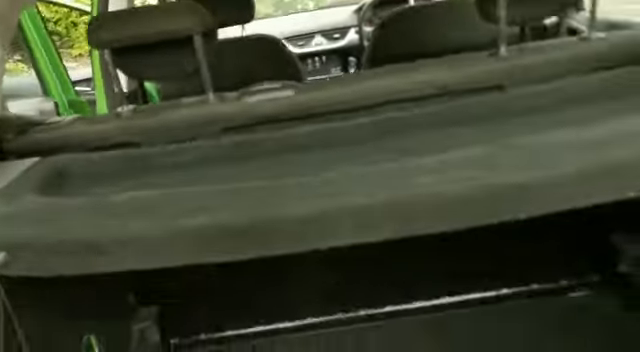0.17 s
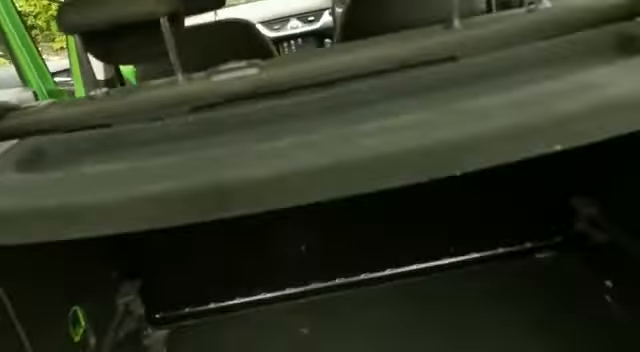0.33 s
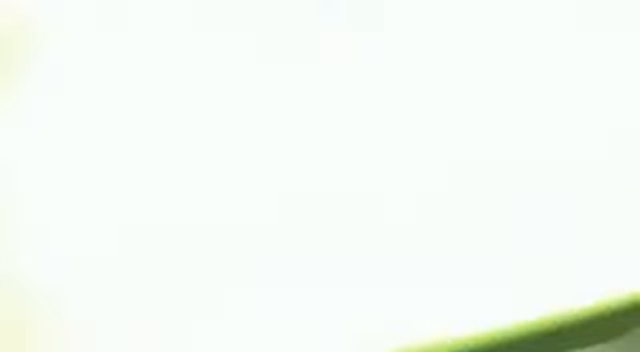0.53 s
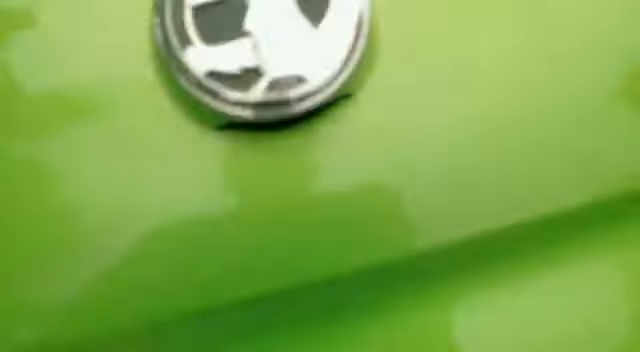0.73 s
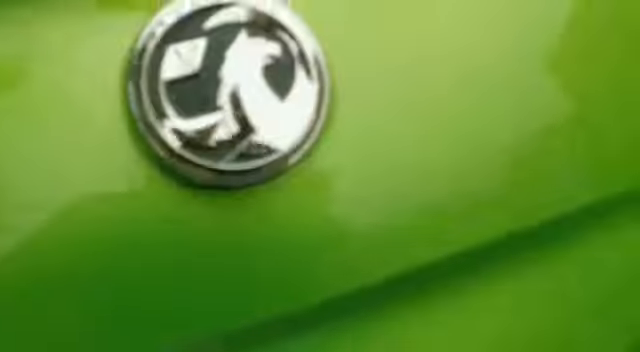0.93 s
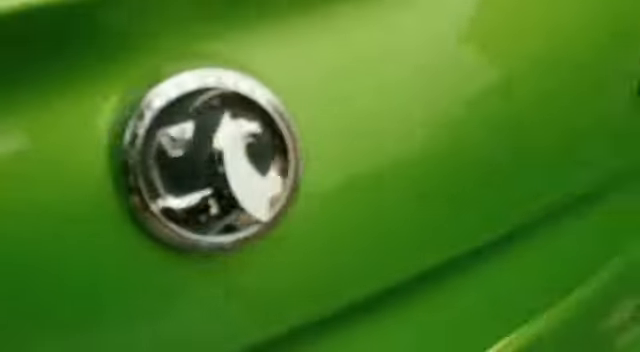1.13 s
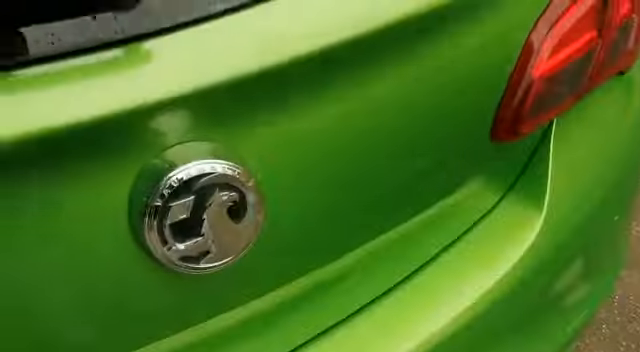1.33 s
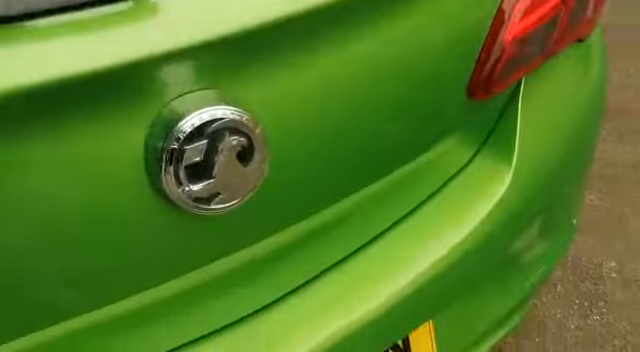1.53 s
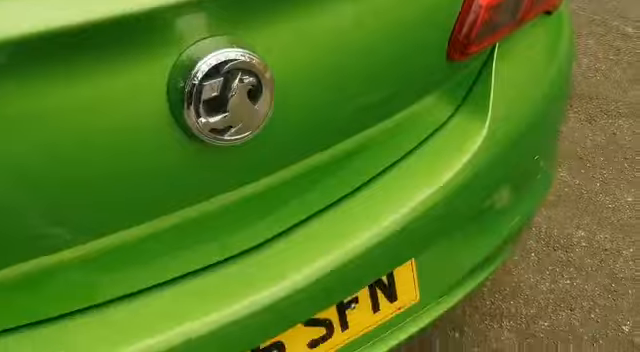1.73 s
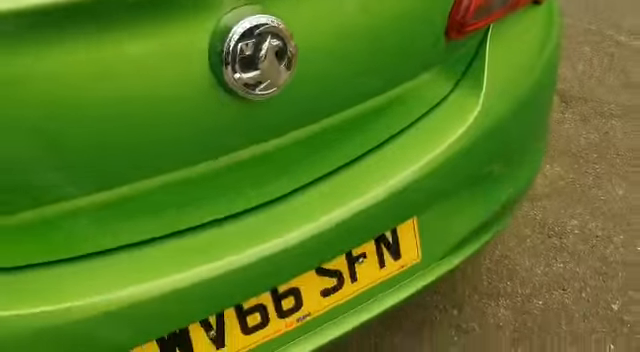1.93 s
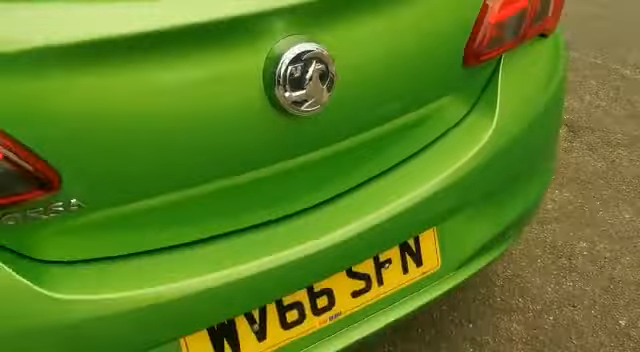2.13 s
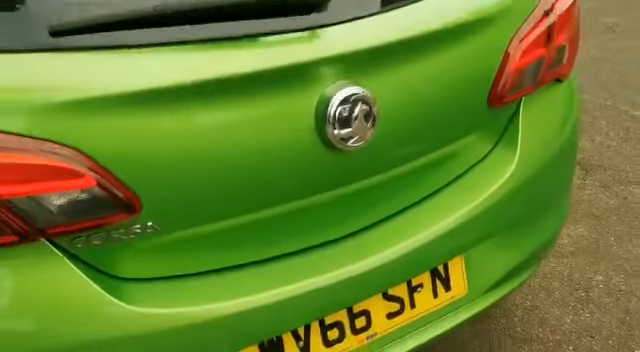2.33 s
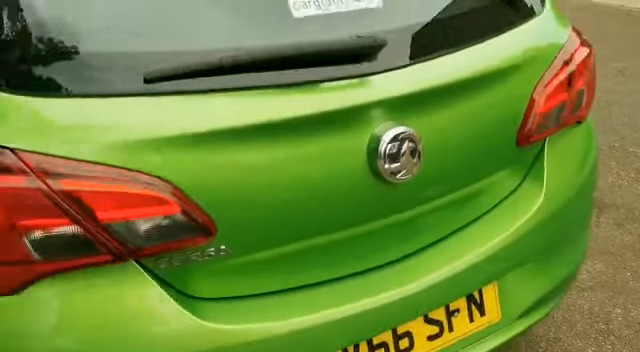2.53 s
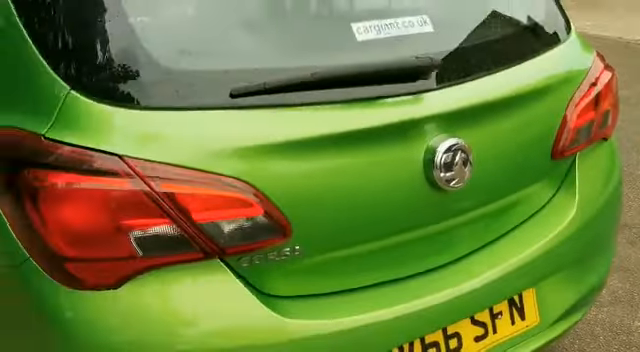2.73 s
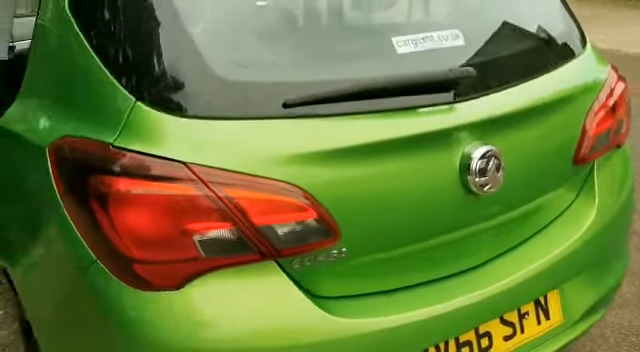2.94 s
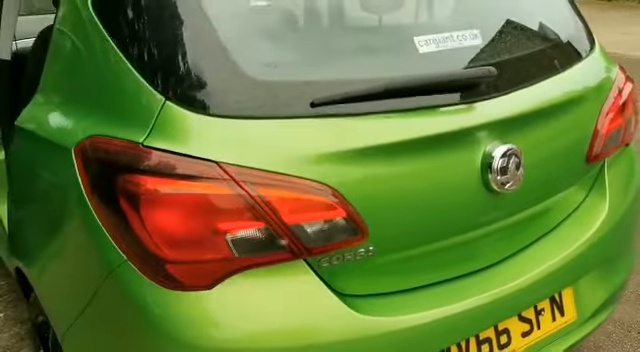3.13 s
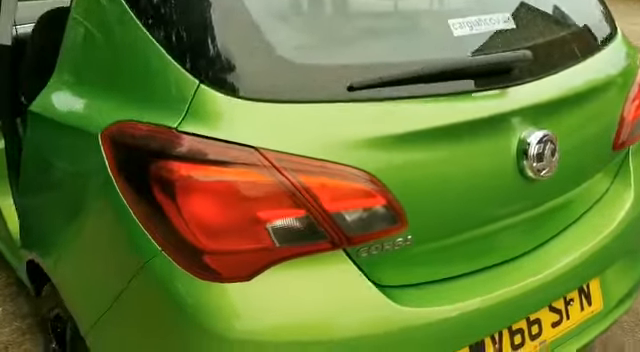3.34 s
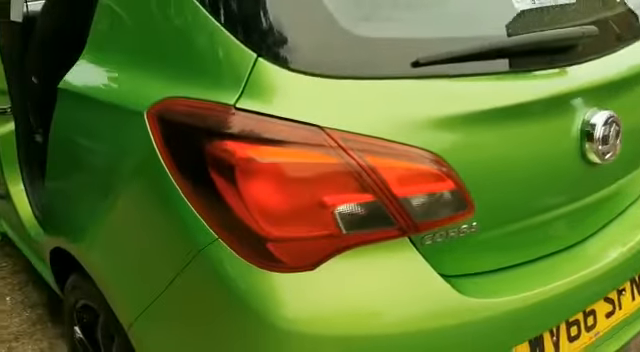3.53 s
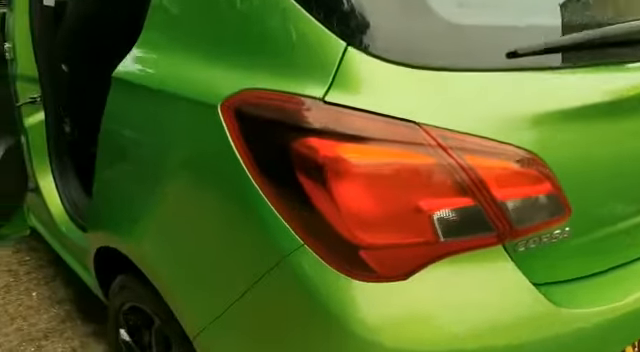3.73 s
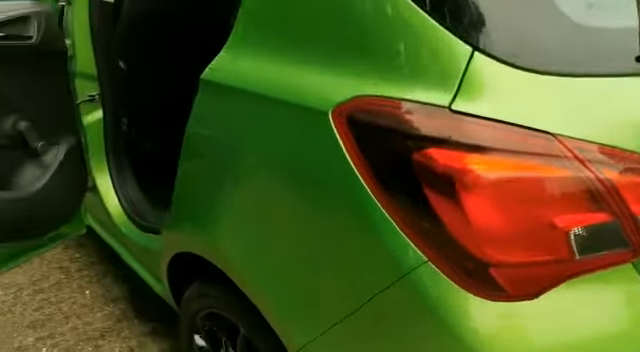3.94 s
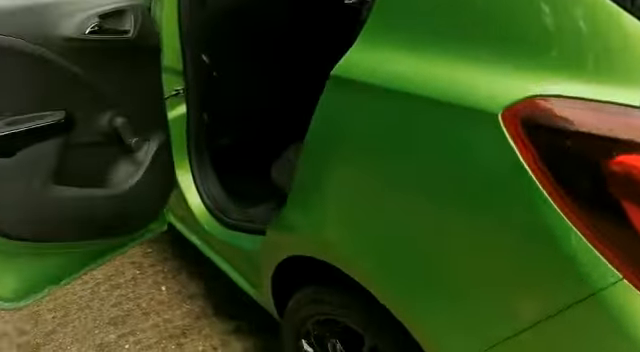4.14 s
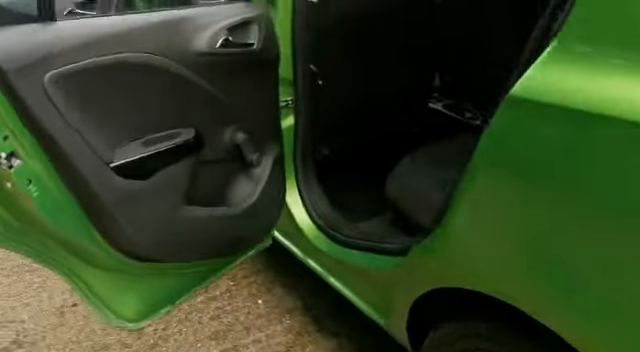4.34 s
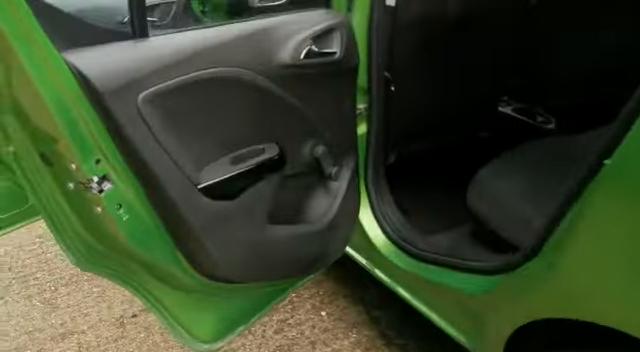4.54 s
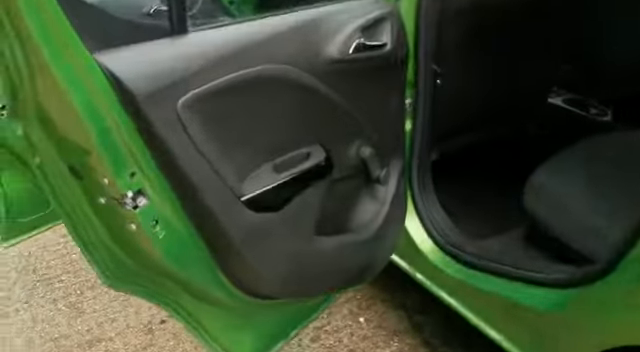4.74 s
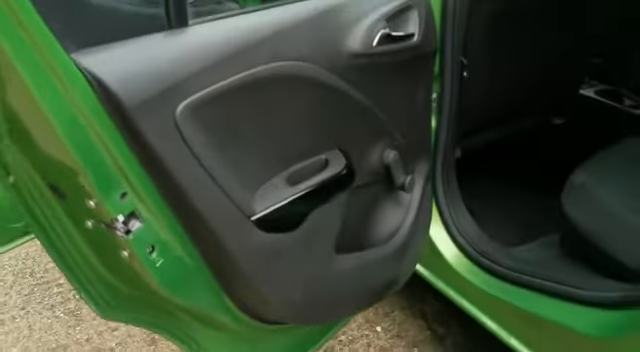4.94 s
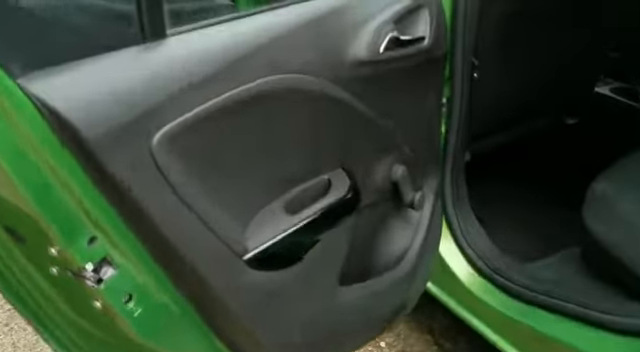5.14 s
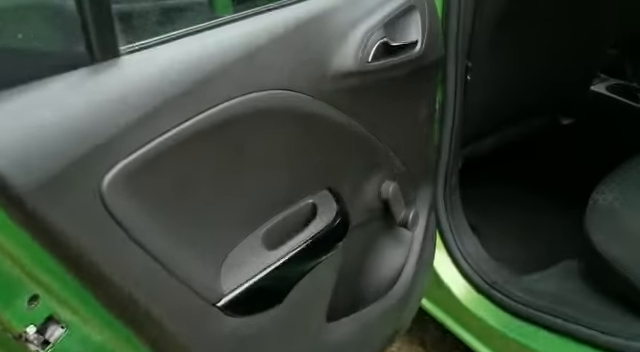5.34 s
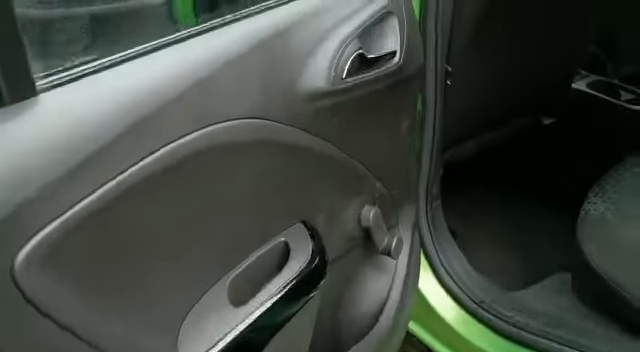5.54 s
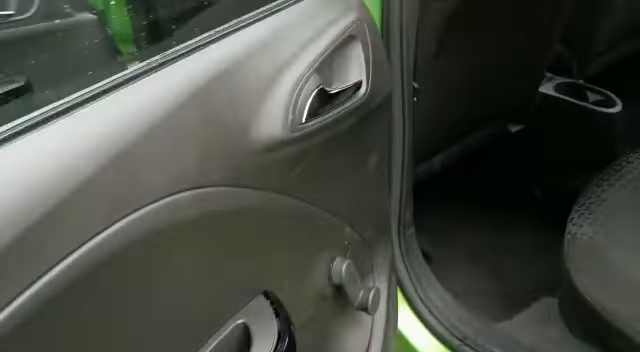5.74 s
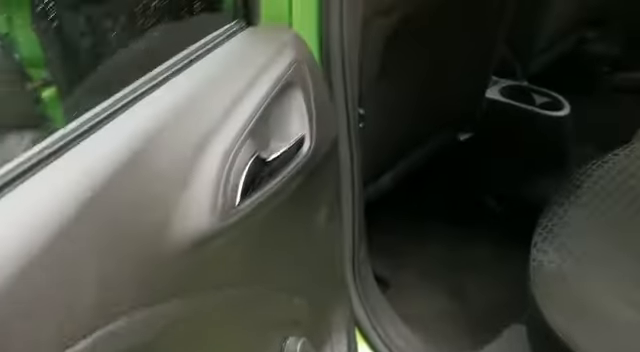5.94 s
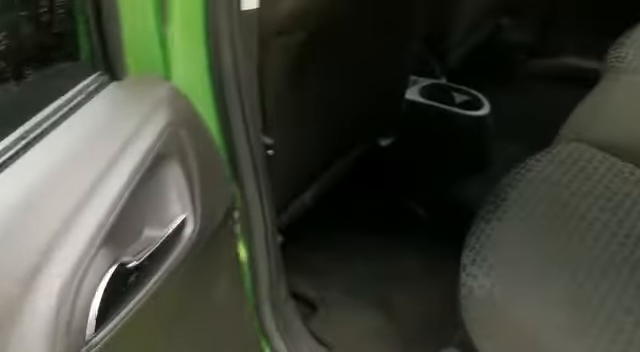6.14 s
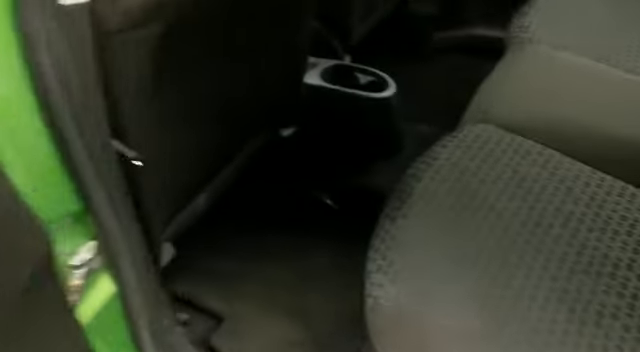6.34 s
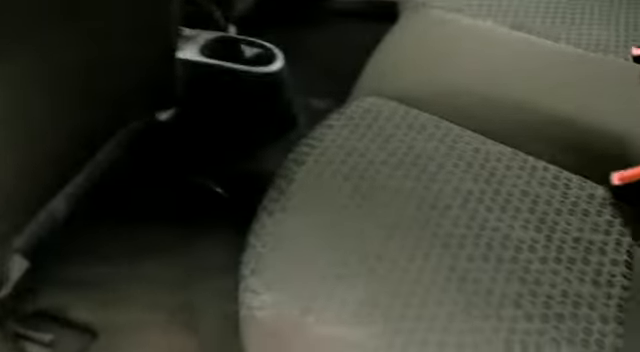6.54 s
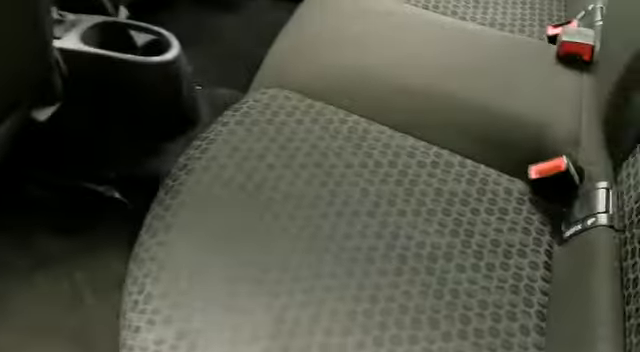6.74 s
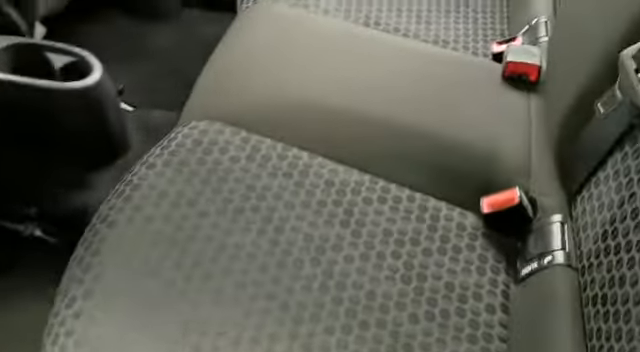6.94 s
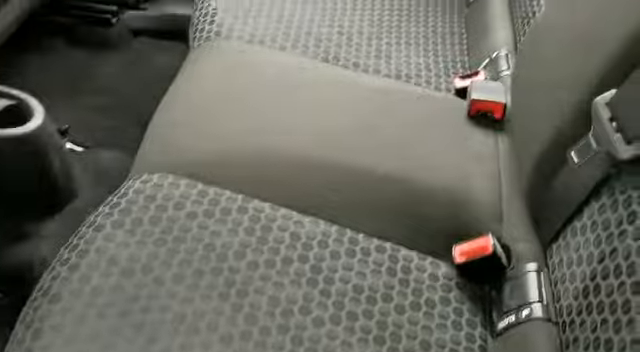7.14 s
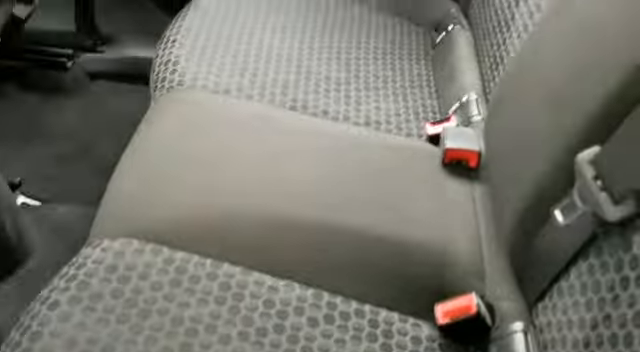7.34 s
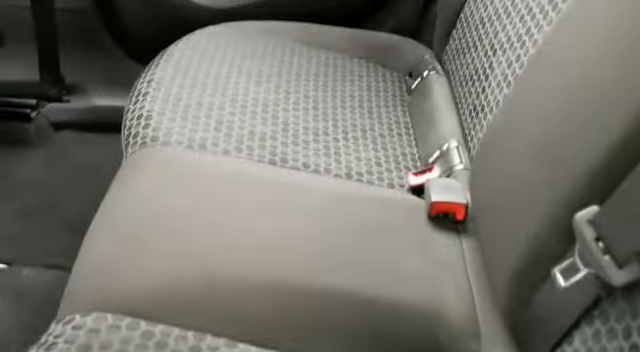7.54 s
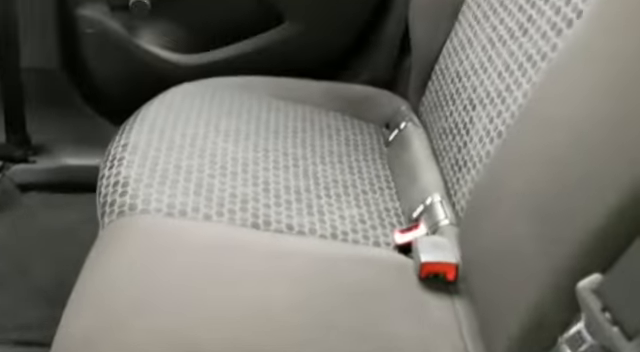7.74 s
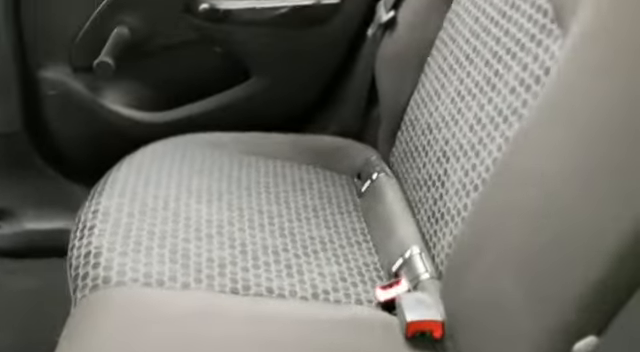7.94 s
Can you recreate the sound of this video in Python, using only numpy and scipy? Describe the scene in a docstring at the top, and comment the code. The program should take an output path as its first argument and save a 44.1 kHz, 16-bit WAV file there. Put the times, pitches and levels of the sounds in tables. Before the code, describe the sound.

Outdoors by a parked hatchback, small birds chirp and shoes scuff; the tailgate slams once with a booming metallic thud, then footsteps, clicks and more chirps.

```python
"""First comes an open-air hush with a hollow drone, a low throb, rustling clothes and chirping birds.
Footfalls and scuffs join in, then a hatchback's tailgate slams: metal rings, cabin air booms, a latch snaps.
Clicks and more calls follow. Shaped noise makes the hush, brushing and clatter; sine waves with
a bending pitch make the birds; dying sine waves make the boom and the panel tones.
The two channels differ: the right one is strong near 3 kHz and weak near 7.6 kHz."""
import sys
import numpy as np
from scipy import signal
from scipy.fft import rfft, irfft, next_fast_len
from scipy.io import wavfile

SR = 44100
rng = np.random.default_rng(int(sys.argv[2]) if len(sys.argv) > 2 else 0)


def wav_record(signal):
    """Record a signal, one row per channel, as 16-bit PCM in the file named by sys.argv[1]."""
    frames = np.transpose(np.atleast_2d(signal))
    bounded = np.clip(frames, -1, 1)
    # unit amplitude maps onto the largest positive 16-bit level
    quanta = np.round(bounded * 32767).astype(np.int16)
    wavfile.write(sys.argv[1], SR, quanta)


N = 352138
TIME = np.arange(N) / SR


def from_db(db):
    """Turn decibels into an amplitude factor."""
    return 10 ** (np.asarray(db) / 20)


def level_over_time(points):
    """Draw a gain curve through (time in s, level in dB) points."""
    return from_db(np.interp(TIME, *np.transpose(points)))


def at_hz(points, hz):
    """Read a table between its points, with frequency spaced as we hear it (logarithmic)."""
    known_hz, values = np.transpose(points)
    return np.interp(np.log(np.maximum(hz, 1)), np.log(known_hz), values)


def colour(x, spectrum):
    """Filter with the given gains in dB, without sounding ahead of the input (minimum phase)."""
    size = 2 * next_fast_len(x.shape[-1] // 2 + 4096)
    gains = from_db(at_hz(spectrum, np.fft.rfftfreq(size, 1 / SR)))
    # Folding the cepstrum forward in time gives the filter its minimum phase.
    cepstrum = irfft(np.log(gains))
    cepstrum[1:size // 2] *= 2
    cepstrum[size // 2 + 1:] = 0
    response = np.exp(rfft(cepstrum))
    return irfft(rfft(x, size) * response)[..., :x.shape[-1]]


# How alike left and right are in sound from all around: pitch_hz, likeness (0 to 1)
LIKENESS = [(60, 0.97), (150, 0.69), (300, 0.96), (640, 0.26), (1400, 0.01), (3000, 0)]


def diffuse(size):
    """Stereo noise of 0 dB per Hz, alike in the bass and unrelated in the treble."""
    padded = next_fast_len(size)
    mid, side = rfft(rng.standard_normal((2, padded)))
    alike = np.clip(at_hz(LIKENESS, np.fft.rfftfreq(padded, 1 / SR)), 0, 1)
    shared = np.sqrt(1 + alike) * mid
    opposed = np.sqrt(1 - alike) * side * [[1], [-1]]
    return irfft(shared + opposed, padded)[:, :size] * np.sqrt(SR) / 2


def dying(t, t60):
    """Fall by 60 dB in t60 seconds; silent before zero."""
    return (t >= 0) * np.exp(-np.log(1000) * np.maximum(t, 0) / t60)


def ring(t, hz, t60):
    """One way a struck object vibrates: a sine wave that dies away."""
    return np.sin(2 * np.pi * hz * t) * dying(t, t60)


def wobble(size, per_s):
    """Random motion: per_s random values a second, joined by straight lines."""
    knots = rng.standard_normal(1024)
    return np.interp(TIME[:size] * per_s, np.arange(len(knots)), knots)


def add(out, s, sound):
    """Mix a sound in from time s on."""
    start = max(round(s * SR), 0)
    part = sound[..., :max(N - start, 0)]
    out[..., start:start + part.shape[-1]] += part


def knock(db, hz, width_hz, t60):
    """A sharp start and a dying flurry of noise, through a broad resonance; db is its peak."""
    t = TIME[:SR // 2]
    burst = diffuse(len(t)) / np.sqrt(SR / 2) * dying(t, t60) + 1e-18
    burst[:, 0] += 4   # the sharp start
    r = np.exp(-np.pi * width_hz / SR)
    resonance = [1, 0, -1, 1, -2 * r * np.cos(2 * np.pi * hz / SR), r * r]
    sound = signal.sosfilt([resonance, resonance], burst)   # twice, for steep skirts
    return from_db(db) * sound / np.abs(sound).max(axis=1, keepdims=True)


# Distant traffic and breeze before the swell: pitch_hz, level_db_per_hz
AIR_SPECTRUM = [(20, -75), (60, -76.5), (110, -76.5), (200, -81.5), (400, -90.5), (1000, -99.5),
                (2000, -102), (4000, -104), (6000, -110), (7500, -113), (9300, -109), (12000, -113),
                (15500, -115)]
# Swell of that hush: time_s, level_db
AIR_LEVEL = [(0, -0.5), (2.5, -1.5), (3.9, -1.5), (4.3, 1), (5.2, -1.5), (5.9, 0.5), (6.6, -0.5), (7.6, -3),
             (8, -2.5)]


def open_air():
    """Distant traffic and breeze: noise with its own colour and a gentle swell."""
    return colour(diffuse(N), AIR_SPECTRUM) * level_over_time(AIR_LEVEL)


# Hollow drone before the swell: pitch_hz, level_db_per_hz
DRONE_SPECTRUM = [(400, -112), (560, -98), (650, -91), (800, -100), (940, -98), (1150, -103), (1500, -101),
                  (2200, -116), (5000, -135)]
# Swell of the drone beside the open door: time_s, level_db
DRONE_LEVEL = [(0, -9), (3.9, -3.5), (4.5, 0.5), (5.3, 2), (5.8, -0.5), (6.3, -21), (8, -6)]


def hollow_drone():
    """Noise gathered into a few pitch regions sounds hollow."""
    return colour(diffuse(N), DRONE_SPECTRUM) * level_over_time(DRONE_LEVEL)


THROB_HZ = 22.69
# Harmonics of the throb, lowest first: level_db
THROB_HARMONICS = [-48, -56, -78, -69.5]


def throb():
    """A faint steady tone built from its first harmonics."""
    out = np.zeros(N)
    for harmonic, db in enumerate(THROB_HARMONICS, start=1):
        out += from_db(db) * np.cos(2 * np.pi * harmonic * THROB_HZ * TIME)
    return out


# Rustle of clothes: time_s, level_db (relative to the brushing spectrum)
RUSTLE_LEVEL = [(0, -13.5), (2.1, -8.5), (2.7, -19), (4.1, -22), (4.6, -9.5), (5.5, -11), (6.0, -6),
                (6.4, -21), (7.0, -8), (8, -16)]
# Shoes brushing the ground: start_s, level_db (relative to the brushing spectrum)
SCUFFS = [(0.161, 2.5), (.29, 1.5), (.40, -1), (0.86, -3), (1.32, 1), (1.79, -1.5), (2.45, -2), (3.609, -2),
          (4.235, -2.5), (5.79, 4), (6.57, 1)]
# Brushing of shoes and clothes before its strength is set: pitch_hz, level_db_per_hz
BRUSHING_SPECTRUM = [(1000, -122), (3000, -114), (6000, -110), (9500, -107), (13000, -111), (15500, -114)]
SCUFF_RISE_S, SCUFF_LEFT_DB = 0.026, 1.5


def brushing(grain_db=4.5):
    """Gritty noise: scuffs start quickly and trail off over the rustle of clothes."""
    pressure = level_over_time(RUSTLE_LEVEL)
    for s, db in SCUFFS:
        age = np.maximum(TIME - s, 0) / SCUFF_RISE_S
        pressure += from_db(db) * age * np.exp(1 - age)
    # Each grain holds one random strength for 32 samples.
    grain_strength = np.repeat(rng.standard_normal(N // 32 + 1), 32)[:N]
    noise = diffuse(N) * pressure * from_db(grain_db * grain_strength)
    return colour(noise, BRUSHING_SPECTRUM) * from_db([[SCUFF_LEFT_DB], [0]])


# Syllable shapes, by name: pitch at even steps, as a share of the top pitch
SHAPES = {"slur": [0.99, 0.96, .83, .72, .65], "arch": [.83, 1, 1, .94, .82, .77, .74], "pip": [.89, 0.98,
          0.99, .98, .9], "peak": [.74, .85, 1, .88, .73], "whistle": [1, 0.96, .91, .89]}
# How each shape is sung, by name: fade_db from start to end, hoarseness (0 to 1)
VOICING = {"slur": (1, 0.42), "arch": (9.4, .27), "pip": (0.73, 0.38), "peak": (1, 0.43),
           "whistle": (0, .1)}


def syllable(shape, length_s, top_hz, db, waver=0.018, edge=0.22,
             low_voice=0.32, low_voice_ratio=0.85, quaver_db=2.0):
    """A whistle with a fast, hoarse flutter; the other half of the syrinx sings lower with it."""
    size = int(length_s * SR)
    fade_db, hoarseness = VOICING[shape]
    progress = np.linspace(0, 1, size)
    steps = np.linspace(0, 1, len(SHAPES[shape]))
    pitch = top_hz * np.interp(progress, steps, SHAPES[shape])
    phase = 2 * np.pi * np.cumsum(pitch * (1 + waver * wobble(size, 442.4))) / SR
    flutter = hoarseness * wobble(size, 1279)
    voices = np.sin(phase + flutter)
    voices += low_voice * hoarseness * np.sin(low_voice_ratio * phase + 2 * flutter)
    roughness = 1 + hoarseness * wobble(size, 1115)
    # Both ends are smoothed over this share of the syllable.
    swell = np.sin(np.pi / 2 * np.clip(np.minimum(progress, 1 - progress) / edge, 0, 1))
    loudness = from_db(db - fade_db * progress + quaver_db * wobble(size, 161))
    return loudness * swell * voices * roughness


# Two-syllable calls, by name, a row per syllable:
# shape, start (share of call), length (share of call), pitch_ratio, level_db (added to the call's)
PHRASES = {"cheer": [("slur", 0, .48, 0.99, 0), ("arch", .59, .45, .71, 2.1)],
           "chirrup": [("pip", 0, 0.287, 1, 0), ("arch", .27, .73, .81, 0.89)],
           "flick": [("slur", 0, 0.58, 0.96, -12.5), ("arch", .48, .52, .87, 4.9)]}


def sing(calls):
    """Each call is one syllable or a phrase of two, stretched and transposed."""
    song = np.zeros(N)
    for s, call, length_s, top_hz, db in calls:
        parts = PHRASES.get(call, [(call, 0, 1, 1, 0)])
        for shape, start, share, ratio, accent_db in parts:
            sound = syllable(shape, share * length_s, ratio * top_hz, db + accent_db)
            add(song, s + start * length_s, sound)
    return song


# Nearby calls and two distinct echoes of them (the slurs at 5.2 and 5.595): start_s,
# syllable or phrase name, length_s, reference pitch_hz, level_db (before path and scattered echoes)
CHIRPS = [ (0.131, "pip", .048, 4460, -51), (0.137, "arch", .066, 3626, -56.5),
          (0.221, "peak", 0.031, 4630, -49.5), (0.353, "chirrup", 0.099, 4610, -55.5),
          (0.588, "peak", 0.084, 4410, -62), (0.75, "slur", .11, 6120, -63),
          (0.835, "cheer", 0.13, 4716, -48.5), (0.992, "arch", .095, 3523, -52.5),
          (0.999, "pip", 0.0326, 4150, -55.5), (1.184, "arch", 0.072, 3790, -56),
          (1.272, "pip", .034, 6700, -57), (1.306, "whistle", .036, 6450, -51.5),
          (1.364, "arch", .064, 3930, -53.5), (1.727, "pip", 0.037, 4700, -45),
          (1.806, "peak", 0.044, 4786, -50), (1.828, "arch", 0.066, 3664, -47),
          (2.026, "chirrup", .132, 4083, -59.5), (2.238, "chirrup", .12, 4266, -57),
          (2.403, "slur", 0.036, 3890, -64.5), (2.804, "flick", .116, 4590, -51.5),
          (3.206, "cheer", .132, 4790, -47), (3.235, "pip", 0.1, 8500, -64.5),
          (3.434, "arch", 0.098, 3330, -57), (4.204, "pip", 0.025, 4700, -61.5),
          (4.386, "peak", .042, 4800, -50), (4.427, "arch", .066, 3650, -52),
          (4.484, "pip", .04, 4653, -43.5), (4.566, "pip", 0.041, 4553, -48.5),
          (4.645, "arch", 0.11, 3490, -52), (4.825, "whistle", .066, 6570, -55.5),
          (5.154, "slur", .04, 4650, -59), (5.2, "slur", .08, 4500, -64),
          (5.56, "cheer", 0.15, 4720, -53.5), (5.595, "slur", 0.065, 4620, -52.5),
          (6.048, "flick", .066, 4800, -54), (6.17, "whistle", 0.078, 6400, -66),
          (6.245, "whistle", .15, 5200, -71), (6.694, "pip", 0.083, 5710, -61)]
# Level of birds in farther gardens, before the echoes: time_s, level_db
FAR_LEVEL = [(0, -62), (1, -66.5), (2.6, -75.5), (4.2, -68), (5.7, -67), (6.3, -68), (6.7, -67),
             (7.15, -73), (7.35, -88)]


def far_chirps(count=130):
    """Birds in farther gardens repeat the lower rows of the chirp table at random moments."""
    songs = [row[1:4] for row in CHIRPS if row[3] < 5000]
    moments = (np.arange(count) + rng.random(count)) * N / SR / count
    choices = rng.integers(len(songs), size=count)
    calls = []
    for s, which in zip(moments, choices):
        db = np.interp(s, *np.transpose(FAR_LEVEL))
        calls.append((s, *songs[which], db))
    return calls


def street(x, t60, build_s, lumpy_db):
    """Scattered echoes from walls, fences and cars: uneven in strength, different on each side."""
    t = TIME[:SR]
    echoes = rng.standard_normal((2, SR)) * dying(t, t60) * (1 - np.exp(-t / build_s))
    lumps = np.interp(t, np.linspace(0, 1, 200), rng.standard_normal(200))
    echoes *= from_db(lumpy_db * lumps)
    echoes /= np.sqrt(np.sum(echoes ** 2, axis=1, keepdims=True))
    return signal.fftconvolve(x[None], echoes, axes=1)[:, :N]


# Straight path as the car comes between bird and microphone: time_s, level_db
BIRD_DIRECT = [(0, 6), (.8, 5.5), (3.4, 5.5), (4.5, -1), (5.6, -0.5), (7.9, -6)]
WALL_DELAY_S, WALL_DB = .042, -9.5   # echo from the nearest house wall
BIRD_LEFT_DB = -4.5


def birds(echo_db=0.5):
    """The chirp table is heard directly, off a wall and scattered; far birds only scattered."""
    near = sing(CHIRPS)
    far = sing(far_chirps())
    direct = near * level_over_time(BIRD_DIRECT)
    add(direct, WALL_DELAY_S, from_db(WALL_DB) * near)
    scattered = street(near + far, t60=0.57, build_s=0.0017, lumpy_db=2.5)
    return (direct + from_db(echo_db) * scattered) * from_db([[BIRD_LEFT_DB], [0]])


# Soft footfalls and bumps: start_s, peak_db, pitch_hz
BUMPS = [(1.091, -40.5, 70), (1.286, -34, 90), (1.845, -30.5, 48.6), (3.609, -40.5, 83.5), (3.789, -44, 59),
         (4.08, -44, 210), (4.171, -39.5, 98), (4.36, -45, 98), (5.85, -42.5, 125.3), (6.15, -42, 109),
         (7.12, -50, 110), (7.72, -48, 105)]
BUMP_T60_S = 0.39


def footfalls(bump_width=0.59):
    """Dull knocks; each one's resonance has a width that is a share of its pitch."""
    out = np.zeros((2, N))
    for s, db, hz in BUMPS:
        add(out, s, knock(db, hz, bump_width * hz, BUMP_T60_S))
    return out


# Small clicks: dull, bright, and one very short one near the end:
# start_s, peak_db, pitch_hz, t60_s
TICKS = [(1.4365, -34, 1020, .064), (1.693, -48, 890, .018), (1.724, -42, 1470, 0.0064),
         (2.965, -42.5, 880, 0.0098), (4.07, -44, 1190, 0.015), (4.090, -46.5, 800, .037),
         (4.816, -45.5, 910, 0.021), (5.72, -44.5, 7990, .0034), (6.597, -47, 2330, 0.017),
         (7.217, -44, 6000, .012), (7.218, -49, 950, 0.0093), (7.784, -49, 1400, 0.0081),
         (7.9306, -29.5, 1780, .0008)]
TICK_WIDTH = 1.07   # bandwidth as a share of pitch
TICK_BODY_HZ, TICK_BODY_DB, TICK_BODY_T60_S = 117, -7, 0.036   # thump, level relative to its click


def ticks():
    """Small sharp clicks, each with a dull thump; the higher a click, the broader it is."""
    out = np.zeros((2, N))
    for s, db, hz, t60 in TICKS:
        add(out, s, knock(db, hz, TICK_WIDTH * hz, t60))
        thump = knock(db + TICK_BODY_DB, TICK_BODY_HZ, TICK_WIDTH * TICK_BODY_HZ, TICK_BODY_T60_S)
        add(out, s, thump)
    return out


# Tailgate meets the body: start_s, strength_db
CONTACTS = [(1.4555, 1.5), (1.4628, -2)]
# Dense ring of metal, glass and trim, before strength and decay: pitch_hz, level_db_per_hz
CLATTER_SPECTRUM = [(100, -71), (200, -44.5), (500, -58.5), (900, -58.5), (1500, -60), (2500, -61),
                    (3800, -65), (4600, -60), (6500, -75), (7700, -81), (9500, -73), (15000, -82)]
# How long the ring lasts: pitch_hz, t60_s
CLATTER_T60 = [(100, 0.23), (400, 0.27), (1000, 0.11), (2500, 0.16), (5000, 0.095), (9000, 0.13),
               (15000, 0.1)]


def clatter():
    """Every contact sets countless close tones ringing; each pitch region dies at its own rate."""
    t, out = TIME[:SR // 2], np.zeros((2, N))
    centres = np.geomspace(100, 15000, 9)
    bins_hz = np.fft.rfftfreq(len(t), 1 / SR)
    for s, db in CONTACTS:
        noise = rfft(diffuse(len(t)))
        dense_ring = np.zeros((2, len(t)))
        for hz in centres:
            # Overlapping bands: one at its centre, zero at the neighbouring centres.
            band_gain = at_hz(np.c_[centres, centres == hz], bins_hz)
            dense_ring += irfft(noise * band_gain, len(t)) * dying(t, at_hz(CLATTER_T60, hz))
        add(out, s, from_db(db) * colour(dense_ring, CLATTER_SPECTRUM))
    return out


SEAL_S = 1.463   # the seal closes and squeezes the cabin air
# Tones of the cabin air and the whole door: pitch_hz, level_db, t60_s
CABIN_TONES = [(34.3, -10.5, 0.27), (59, -9.5, 0.14), (115, -14.5, 0.1)]
# Tones of the sheet metal: pitch_hz, level_db, t60_s
PANEL_TONES = [(180.5, -17, 0.21), (241.4, -22.5, 0.3), (306, -40, 0.87), (353, -34.5, 0.16),
               (386, -37, 0.12), (514, -31, 0.16), (563, -48, 0.58), (800, -40, .2), (870, -36.5, 0.11),
               (1180, -31, 0.094), (1386, -30.5, 0.048), (1900, -38, 0.21), (2460, -55, .1),
               (2680, -37, 0.1)]


def cabin_and_panels():
    """Air and sheet metal ring as dying sine waves; neighbours in the tables swing oppositely."""
    t, out = TIME[:2 * SR], np.zeros((2, N))
    for k, (hz, db, t60) in enumerate(CABIN_TONES + PANEL_TONES):
        direction = -(-1) ** k
        add(out, SEAL_S, direction * from_db(db) * ring(t, hz, t60))
    return out


# The body's shudder before its build-up and decay: pitch_hz, level_db_per_hz
SHUDDER_SPECTRUM = [(25, -44), (60, -46.5), (110, -57), (180, -57.5), (300, -69), (550, -87), (1000, -90.5),
                    (3000, -104), (6000, -108), (15000, -120)]


def shudder(t60=1.29, build_s=0.011):
    """Mostly low noise that builds as the blow spreads through the car, then fades."""
    t, out = TIME[:2 * SR], np.zeros((2, N))
    strength = dying(t, t60) * (1 - np.exp(-t / build_s))
    add(out, SEAL_S, colour(diffuse(len(t)) * strength, SHUDDER_SPECTRUM))
    return out


# The latch springs home, before its short burst is shaped: pitch_hz, level_db_per_hz
LATCH_SPECTRUM = [(500, -94), (3000, -75), (6800, -64.5), (7800, -80), (9300, -53), (11500, -82),
                  (13300, -67), (15500, -71)]


def latch(centre_s=1.4672, width_s=0.0032):
    """A very short bell-shaped burst of bright noise makes the snap."""
    t, out = TIME[:2 * SR], np.zeros((2, N))
    snap = np.exp(-.5 * ((t - centre_s) / width_s) ** 2)
    add(out, 0, colour(diffuse(len(t)) * snap, LATCH_SPECTRUM))
    return out


CLICK_S = 6.490
# Resonances of one hard plastic click by the open door: pitch_hz, peak_db, width_hz, t60_s
CLICK_RESONANCES = [(2820, -40, 400, .006), (3770, -37.5, 350, 0.0092), (5060, -37, 760, 0.0099),
                    (8500, -38, 9800, 0.041)]


def plastic_click():
    """Several knocks at the same moment, one for each resonance of the plastic."""
    out = np.zeros((2, N))
    for hz, db, width_hz, t60 in CLICK_RESONANCES:
        add(out, CLICK_S, knock(db, hz, width_hz, t60))
    return out


def scene():
    """Add up all the sounds as they reach the microphones."""
    background = open_air() + hollow_drone() + throb()
    walking = brushing() + footfalls()
    tailgate = clatter() + cabin_and_panels() + shudder() + latch()
    return background + walking + birds() + ticks() + tailgate + plastic_click()


# Colour of the right microphone port: pitch_hz, gain_db
RIGHT_PORT = [(60, 5.5), (200, 2.5), (700, 9.5), (1300, 11), (2400, 13.5), (3500, 13), (4600, 10.5),
              (5400, 3), (6300, -11), (7600, -20), (9000, -9.5), (11000, 3), (13000, 6), (15500, 1)]
CUTOFF_HZ = 15850


def record(dry):
    """The right port colours its channel, peaks are rounded, the top is cut."""
    ports = np.array([dry[0], colour(dry[1], RIGHT_PORT)])
    rounded = 1.346 * np.tanh(ports / 1.27)
    # A steep low-pass: 0.2 dB ripple below the cutoff, 80 dB rejection above.
    low_pass = signal.ellip(10, .2, 80, CUTOFF_HZ, fs=SR, output="sos")
    return signal.sosfilt(low_pass, rounded)


dry = scene()
out = record(dry)
wav_record(out)
```